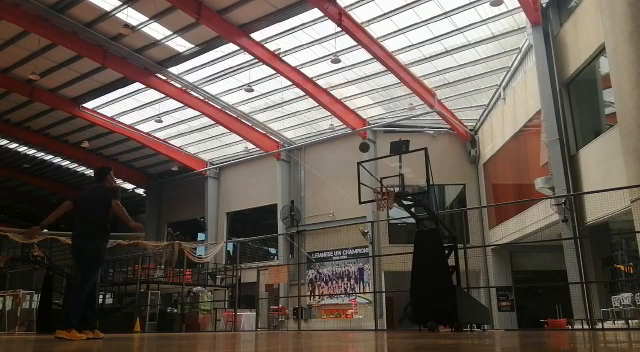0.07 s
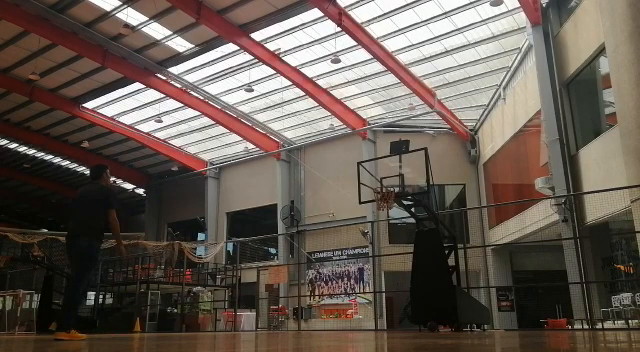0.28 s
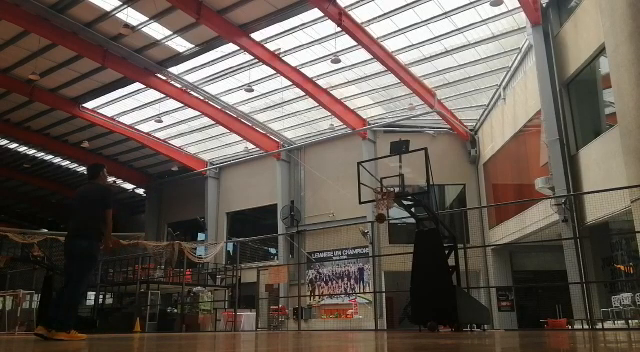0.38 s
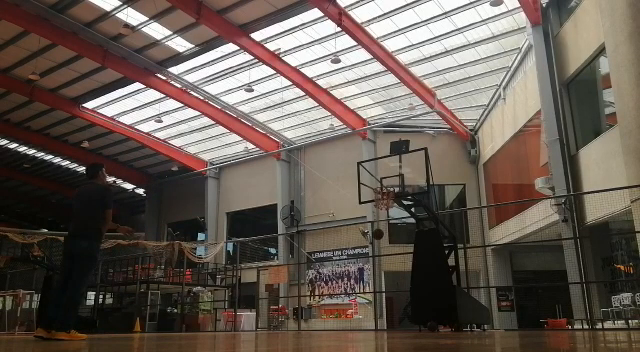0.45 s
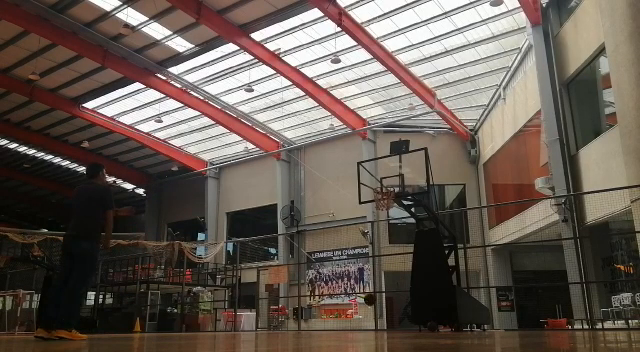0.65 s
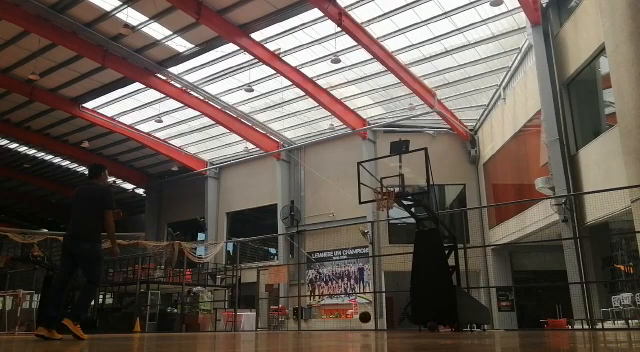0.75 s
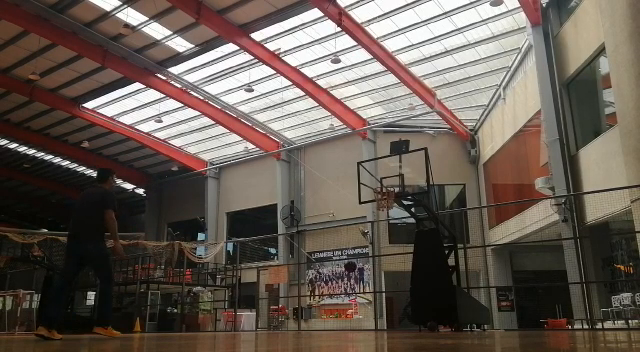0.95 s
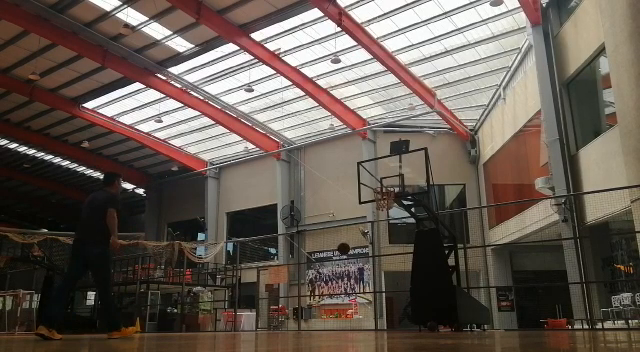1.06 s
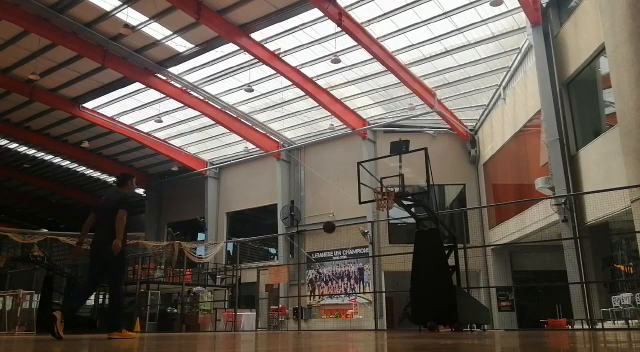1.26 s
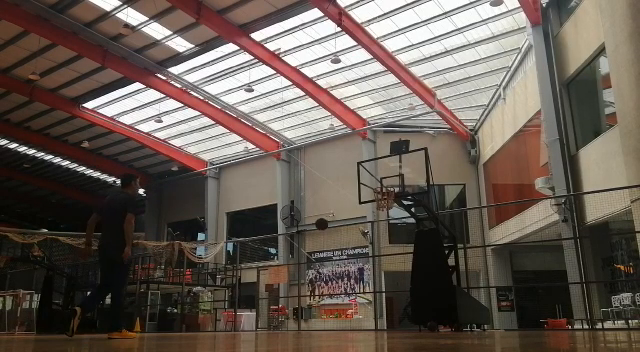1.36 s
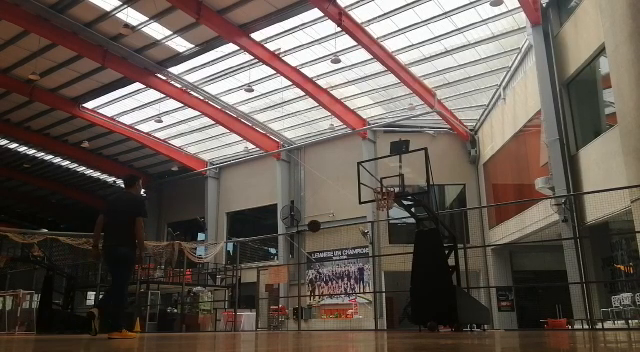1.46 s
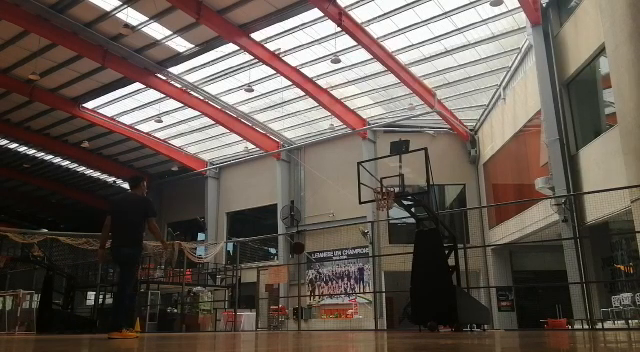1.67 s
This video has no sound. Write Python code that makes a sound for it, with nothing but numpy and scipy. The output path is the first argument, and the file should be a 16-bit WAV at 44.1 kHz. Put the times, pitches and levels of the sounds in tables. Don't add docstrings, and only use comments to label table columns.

```python
import sys
import numpy as np
from scipy import signal
from scipy.fft import rfft, irfft, next_fast_len
from scipy.io import wavfile

SR = 44100
rng = np.random.default_rng(int(sys.argv[2]) if len(sys.argv) > 2 else 0)


def generate_wav(signal):
    frames = np.transpose(np.atleast_2d(signal))
    scaled = np.clip(frames, -1, 1) * 32767
    pcm = np.round(scaled).astype(np.int16)
    wavfile.write(sys.argv[1], SR, pcm)


def to_linear_factor(level_db):
    exponent = np.asarray(level_db, float) / 20
    return 10 ** exponent


N = 74970
T = np.arange(N) / SR
BOARD_S, BOARD_DB = .4128, -29
SLAP_S, SLAP_DB = .8856, -7.5
SPLIT_HZ = 414


def at_hz(points, hz):
    f, value = np.transpose(points)
    return np.interp(np.log(hz), np.log(f), value)


def rms_one(x):
    return x / np.sqrt(np.mean(x ** 2) + 1e-20)


def ring(x, hz, t60):
    r, w = to_linear_factor(-60 / (t60 * SR)), 2 * np.pi * hz / SR
    return signal.lfilter([0, np.sin(w)], [1, -2 * r * np.cos(w), r * r], x + 1e-18)


def butter(x, hz, kind):
    return signal.sosfilt(signal.butter(2, hz, kind, fs=SR, output="sos"), x + 1e-18)


def clicks(s, db):
    out = np.zeros(N)
    np.add.at(out, np.round(np.multiply(s, SR)).astype(int), to_linear_factor(db))
    return out


def dying(start, t60):
    return (T >= start) * to_linear_factor(-60 * np.maximum(T - start, 0) / t60)


def puff(band_hz, start, t60, db):
    return butter(rng.standard_normal(N), band_hz, "band") * dying(start, t60) * to_linear_factor(db)


def build(start):
    build_s = .015
    return 1 - np.exp(-np.maximum(T - start, 0) / build_s)


def band_levels(colour, db, edges, mids):
    level = to_linear_factor(at_hz(colour, mids))
    power = np.sum(level ** 2 * np.diff(edges)) * 2 / SR
    return to_linear_factor(db) * level / np.sqrt(power)


def tail(level, start, t60, bloom_share):
    bloom_s = .46
    bloom = to_linear_factor(60 * bloom_share * np.clip(T - start, 0, bloom_s) / t60)
    return level * dying(start, t60) * bloom * build(start)


# f/Hz, level/dB (per Hz)
HUM_COLOUR = [(22, -5), (50, 3), (100, 4), (200, -9), (500, -22.5), (2000, -31.5), (6000, -46), (9000, -54)]
# f/Hz, level/dB (per Hz)
BOARD_TAIL_COLOUR = [(45, -24), (75, -1), (160, 1.5), (300, -10), (1300, -16), (2200, -28), (7000, -36.5),
                     (12000, -35)]
# f/Hz, level/dB (per Hz)
SLAP_TAIL_COLOUR = [(45, -13), (80, 0), (160, -3), (330, -18), (1000, -17), (3000, -20), (6500, -29),
                    (12000, -39)]
# f/Hz, t60/s
HALL_DECAY = [(60, 2.5), (160, 2.25), (420, 1.38), (1100, 1.63), (2900, 1.83), (6000, 1.17), (9000, 0.73),
              (13000, 0.5)]
# f/Hz, correlation/1
STEREO_LIKENESS = [(60, .99), (250, .92), (500, .55), (1000, -.15), (4000, -.1), (12000, .1)]


def hall():
    hum_db, board_tail_db, slap_tail_db, patchy_db = -48, -32, -32, -.5
    edges = 22 * 2 ** (np.arange(29) / 3)
    mids = np.sqrt(edges[1:] * edges[:-1])
    hum = band_levels(HUM_COLOUR, hum_db, edges, mids)
    board = band_levels(BOARD_TAIL_COLOUR, board_tail_db, edges, mids)
    floor = band_levels(SLAP_TAIL_COLOUR, slap_tail_db, edges, mids)
    settle = 8000
    white = rng.standard_normal((2, 2, N + settle))
    out = np.zeros((2, N))
    for k, hz in enumerate(mids):
        mid, side = butter(white[k % 2], edges[k:k + 2], "band")[:, settle:]
        t60 = at_hz(HALL_DECAY, hz)
        board_tail = tail(board[k], BOARD_S, t60, .1)
        slap_tail = tail(floor[k], SLAP_S, t60, .45)
        level = np.sqrt(hum[k] ** 2 + board_tail ** 2 + slap_tail ** 2)
        patch = np.interp(T, np.arange(40) / 20, rng.standard_normal(40))
        alike = np.clip(at_hz(STEREO_LIKENESS, hz), -1, 1)
        pair = np.sqrt((1 + alike) / 2) * mid + np.sqrt((1 - alike) / 2) * side * [[1], [-1]]
        out += level * to_linear_factor(patchy_db * patch) * pair
    return out


def whine():
    return to_linear_factor(-83) * np.sin(2 * np.pi * 12950 * T)


# t/s, level/dB, f/Hz (boom), t60/s
FOOTFALLS = [
    (.188, -36.5, 81.6, 0.66),
    (0.227, -46, 93, .2),
    (0.268, -33.5, 85, 0.3),
    (.355, -35.5, 89.5, 0.53),
]


def steps():
    booms = [ring(clicks([s], [db]), hz, t60) for s, db, hz, t60 in FOOTFALLS]
    return sum(butter(boom, 160, "low") for boom in booms)


# t/s (delay), bass level/dB, treble level/dB, pan/dB (L-R)
BOARD_RETURNS = [(.0155, -4, -6, 0), (.024, -10, -16, 0), (.034, -12, -22, 0), (.058, -3, -13, 0),
                 (.066, -8, -13, 0), (.103, -7, -20, 0), (.125, -6, -22, 0), (.16, -5, -26, 0),
                 (.275, -9, -34, 0), (.41, -16, -40, 0)]
# t/s (delay), bass level/dB, treble level/dB, pan/dB (L-R)
ROOF_RETURN = (.0153, -18, -4, -2)
# t/s (delay), bass level/dB, treble level/dB, pan/dB (L-R)
SLAP_RETURNS = [(.0027, -52, -18.5, -20), (.022, -25, -21.5, -5), (.030, -4, -25, -16),
                (0.0478, 1.5, -15, 2.5), (.055, 1, -12, -4), (0.102, -20, -27, -8), (.116, -2.5, -9.5, 10),
                (.1235, 2, -10, -9.5), (0.192, -4.5, -24, -3), (0.252, -4.5, -40, -9),
                (.262, -1.5, -37, -4), (.342, -5, -42, 5), (.412, -8, -48, 0), (.497, -10, -55, 0),
                (0.543, -8.5, -51, -3)]


def echoes(x, table):
    rumble_cut_hz, wall_hz = 78.6, 7800
    scatter_s, scatter_db, mirror_s = .004, -20, .03
    x = butter(x, rumble_cut_hz, "high")
    low = butter(x, SPLIT_HZ, "low")
    high = butter(butter(x, SPLIT_HZ, "high"), wall_hz, "low")
    out = np.array([x, x])
    for late, bass_db, treble_db, pan_db in table:
        ribs = to_linear_factor(scatter_db) * rng.standard_normal((2, 400)) * np.exp(-T[:400] / scatter_s * 3)
        ribs[:, 0] = np.exp(-late / mirror_s)
        scattered = signal.fftconvolve(high[None], ribs, axes=1)[:, :N]
        side_db = treble_db + np.array([[.5], [-.5]]) * pan_db
        back = to_linear_factor(bass_db) * low + to_linear_factor(side_db) * scattered
        k = int(late * SR)
        out[:, k:] += back[:, :N - k]
    return out


def panel_hum():
    hz, width_hz, db, t60 = 403, 42, -45, 2.2
    tone = rms_one(ring(rng.standard_normal(N), hz, 2.3 / width_hz))
    return tone * to_linear_factor(db) * dying(BOARD_S, t60) * build(BOARD_S)


# t/s, level/dB
LATE_TICKS = [
    (0.4532, -37.5),
    (.460, -41),
    (.468, -44),
    (.5155, -37.5),
]


def rim_ticks():
    bursts = sum(to_linear_factor(db) * dying(s, .008) for s, db in LATE_TICKS)
    return butter(rng.standard_normal((2, N)), 6000, "high") * bursts


# t/s (delay), level/dB
RIM_TOUCHES = [
    (0, -12.5),
    (.0008, -16),
    (.0017, -8),
    (.0026, -2),
    (.0033, 0),
    (.004, -8),
    (.0075, -8),
    (0.01, -7),
]
# f/Hz, level/dB, t60/s
BOARD_MODES = [(73.6, -8.5, 0.29), (162, -2.5, 0.093), (185, -10, 0.033), (411.9, -3, 0.13),
               (734, -13, 0.0093), (1092, -19.5, 0.041), (1233, -18, 0.051), (1330, -20.5, 0.086),
               (1660, -11.5, 0.0067), (2660, -12, 0.0048)]


def backboard():
    contact_hz, flex_s, flex_db, flex_soft_hz = 7000, .00401, 8.5, 500
    late, db = np.transpose(RIM_TOUCHES)
    signs = rng.choice([-1, 1], N)
    touch = butter(clicks(BOARD_S + late, BOARD_DB + db) * 2.9 * signs, contact_hz, "low")
    body = np.zeros(N)
    for hz, mode_db, t60 in BOARD_MODES:
        if hz < SPLIT_HZ:
            flex = clicks([BOARD_S + flex_s], [BOARD_DB + flex_db + mode_db])
            push = -butter(flex, flex_soft_hz, "low")
        else:
            push = to_linear_factor(mode_db) * touch
        body += ring(push, hz, t60)
    crack = to_linear_factor(1) * butter(touch, 940, "high")
    return body + crack + puff([900, 4000], BOARD_S + late[1], .025, BOARD_DB + 1)


# f/Hz, level/dB, t60/s
FLOOR_MODES = [(85, -20.5, 0.15), (139.3, -10.5, 0.054), (231, -24, 0.017), (935, -23, 0.026),
               (1250, -29, 0.03), (1560, -32, 0.03), (2854, -20.5, 0.016), (4070, -22.5, 0.0063),
               (6140, -31, 0.0014)]


def slap():
    crack_s, thump_s = SLAP_S - .0001, SLAP_S + .0015
    contact_hz = 5100
    crack = -butter(clicks([crack_s], [SLAP_DB]) * 3.6, contact_hz, "low")
    body = np.zeros(N)
    for hz, db, t60 in FLOOR_MODES:
        start = thump_s if hz < SPLIT_HZ else SLAP_S + .0001
        body += ring(clicks([start], [SLAP_DB + db]), hz, t60)
    air = puff([900, 7000], SLAP_S, .09, SLAP_DB - 47)
    first_touch = puff([700, 5000], SLAP_S - .0025, .012, SLAP_DB - 47)
    return crack + body + air + first_touch


def scene():
    background = hall() + whine() + steps()
    board = echoes(backboard(), BOARD_RETURNS) + panel_hum() + rim_ticks()
    return background + board + echoes(slap(), [ROOF_RETURN] + SLAP_RETURNS)


def roll_off(x):
    return signal.sosfilt(signal.butter(12, 15500, fs=SR, output="sos"), x)


# f/Hz, level/dB (L-R)
PORT_BALANCE = [(60, -5.5), (300, -6), (1200, -5.5), (2500, -3), (5000, -9), (7500, -1.5), (9500, 9),
                (13000, 20.5)]
# f/Hz, level/dB
MICROPHONE_COLOUR = [(6500, 2), (7700, -2.5), (8500, -10), (10000, -7.5), (12200, -5.5), (13400, -17.5),
                     (15000, -24)]


def record(dry):
    size = next_fast_len(N + 4096)
    hz = np.maximum(np.arange(size // 2 + 1) * SR / size, 1)
    port = to_linear_factor(at_hz(PORT_BALANCE, hz) * [[.5], [-.5]])
    gain = 2 * port / port.sum(axis=0) * to_linear_factor(at_hz(MICROPHONE_COLOUR, hz))
    padded = np.pad(dry, ((0, 0), (0, size - N)), "reflect")
    x = irfft(rfft(padded) * gain, size)[:, :N]
    x = x + to_linear_factor(-91) * rng.standard_normal(x.shape)
    x = x * np.sin(np.pi / 2 * np.clip((N / SR - T) / .005, 0, 1))
    return roll_off(x)


dry = scene()
out = record(dry)
generate_wav(out)
```